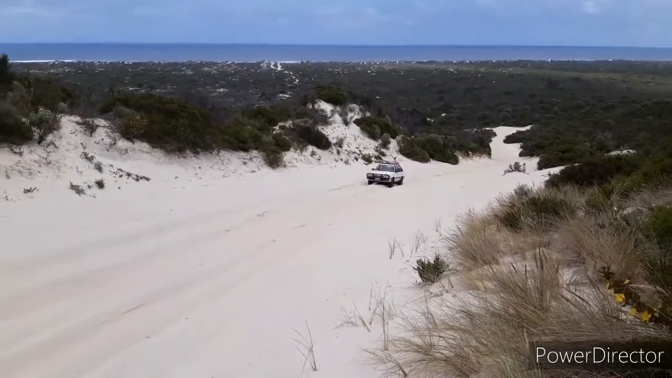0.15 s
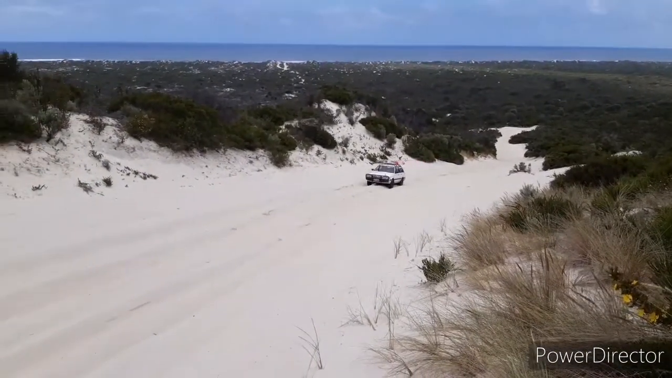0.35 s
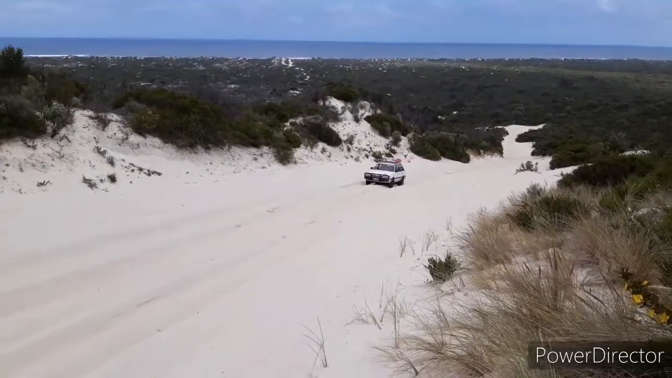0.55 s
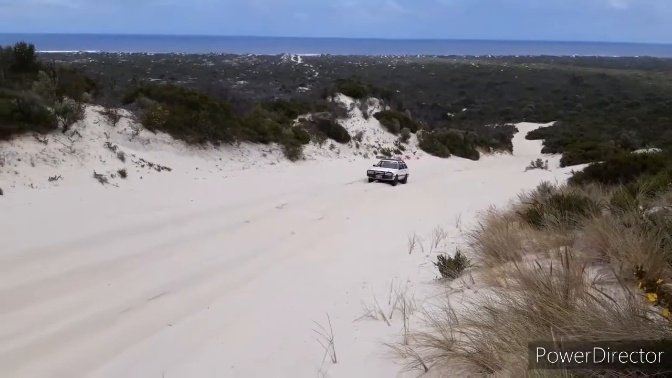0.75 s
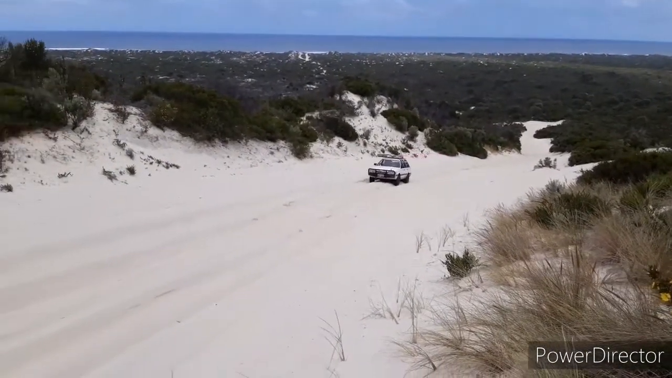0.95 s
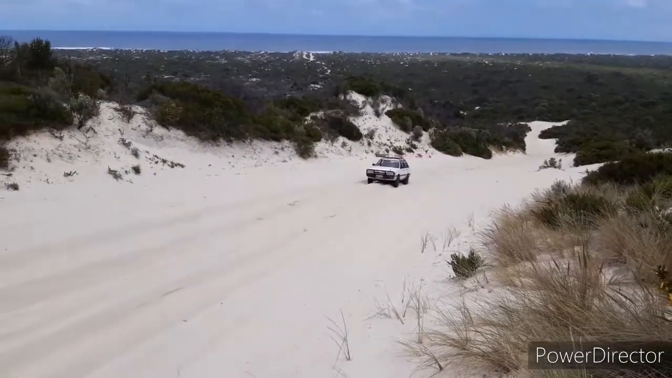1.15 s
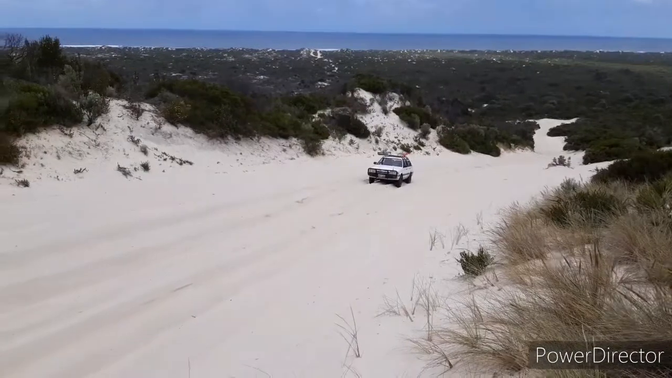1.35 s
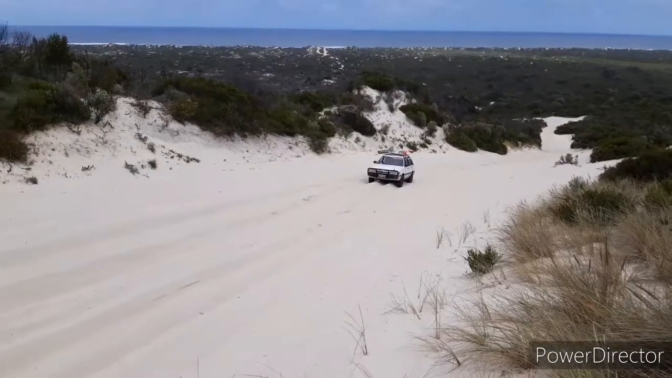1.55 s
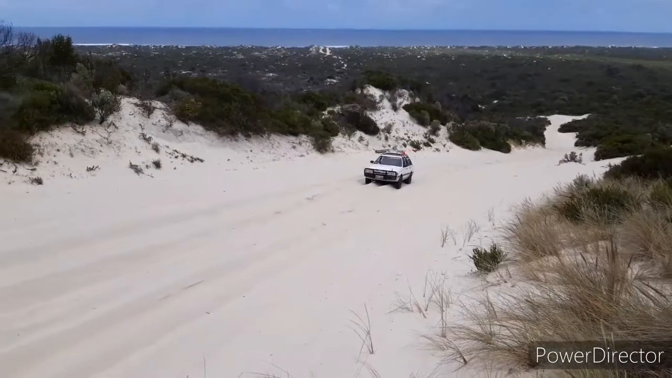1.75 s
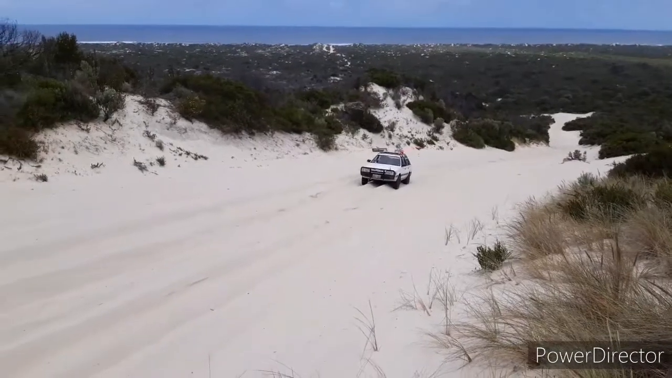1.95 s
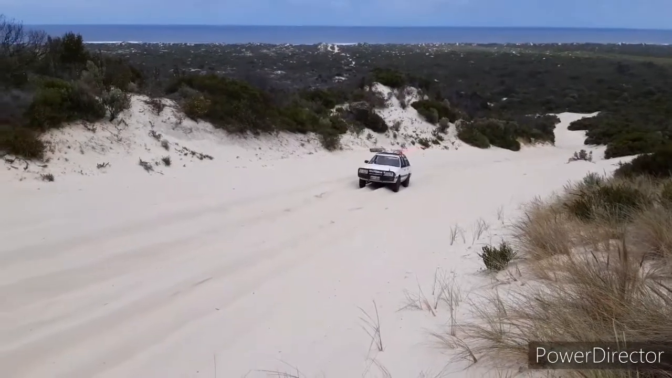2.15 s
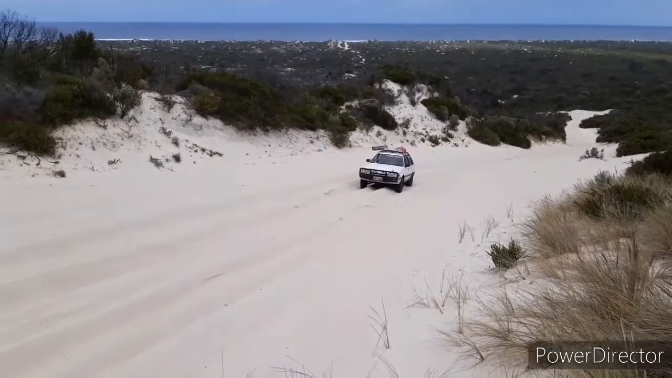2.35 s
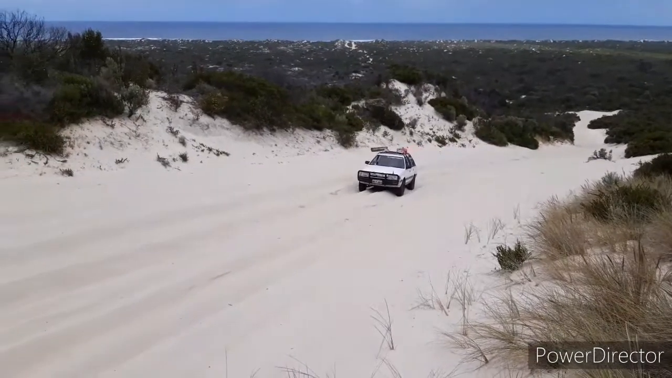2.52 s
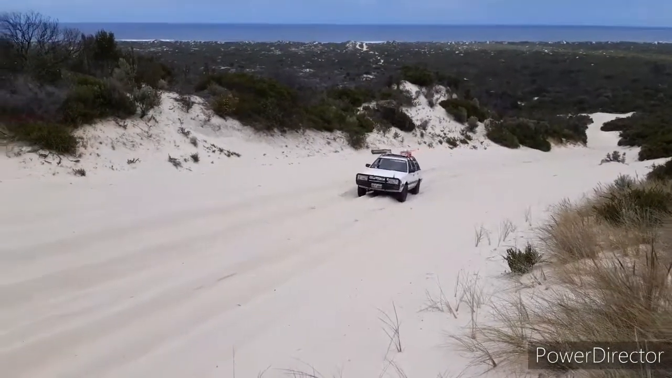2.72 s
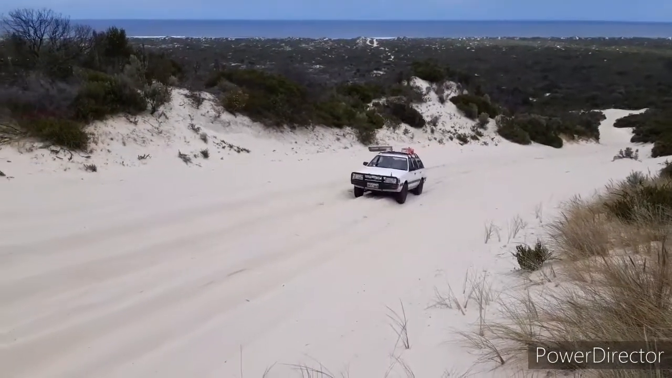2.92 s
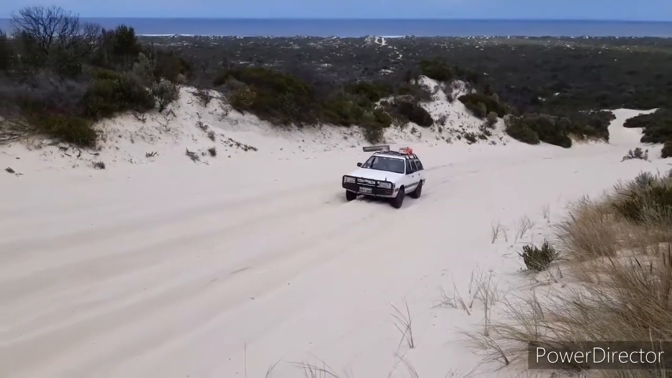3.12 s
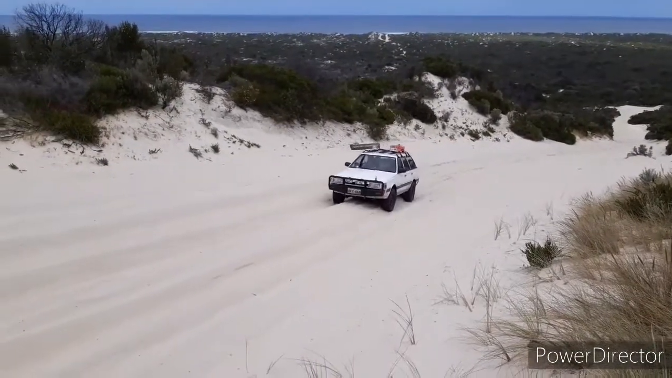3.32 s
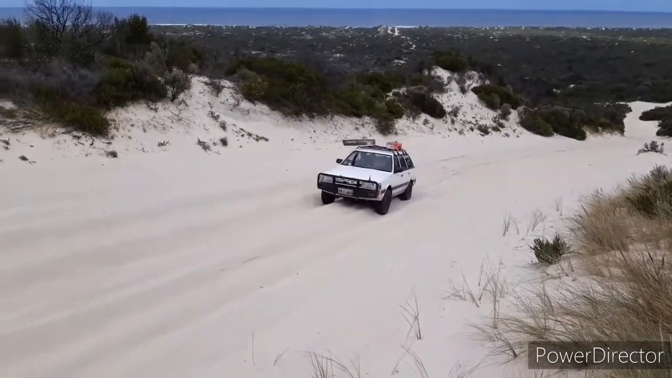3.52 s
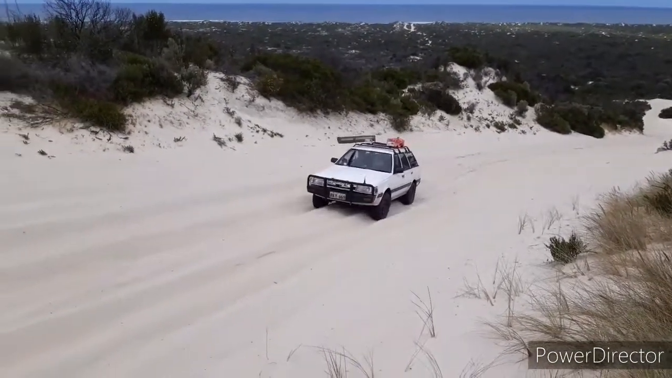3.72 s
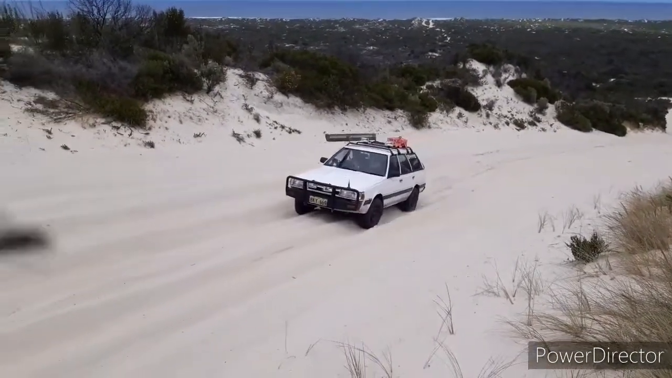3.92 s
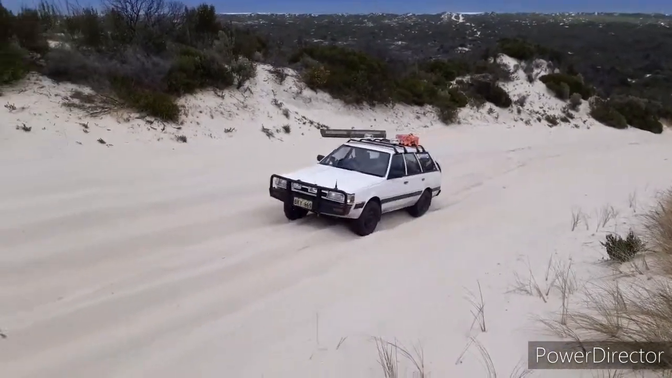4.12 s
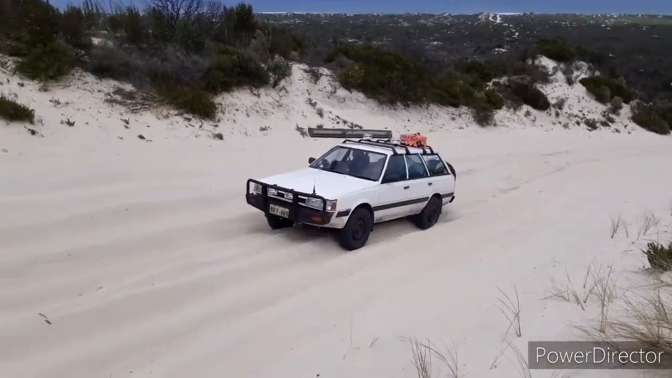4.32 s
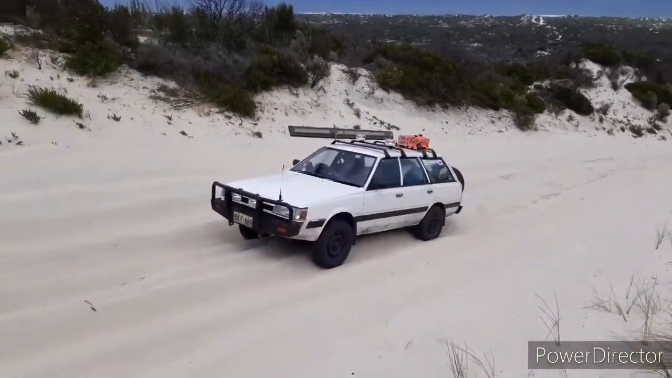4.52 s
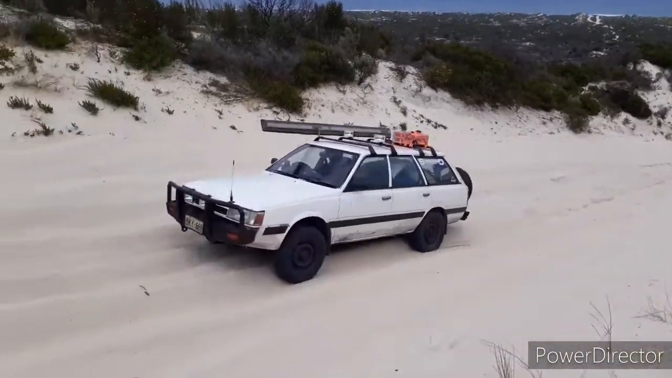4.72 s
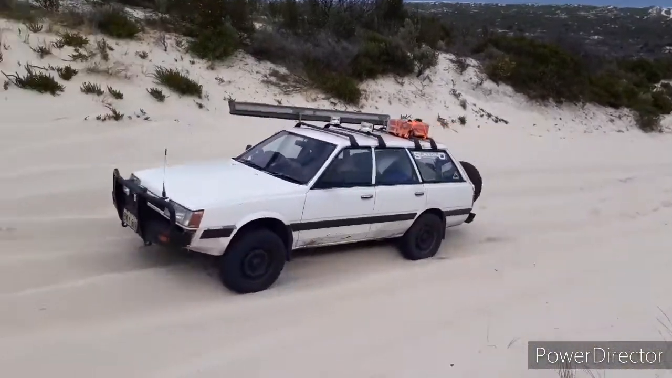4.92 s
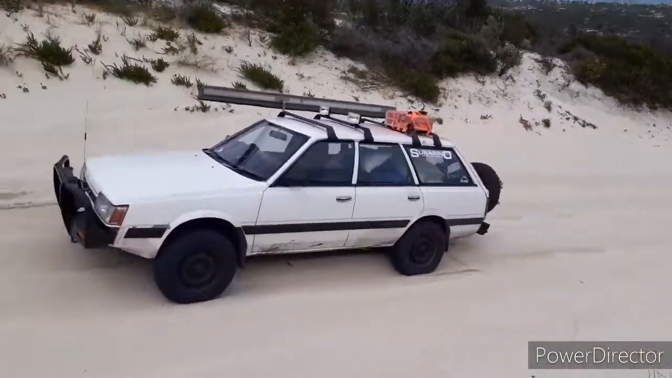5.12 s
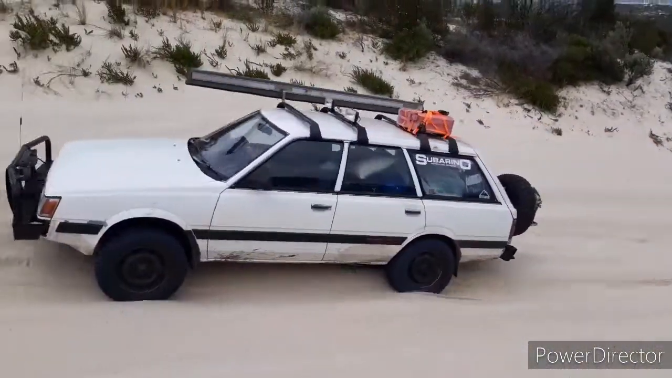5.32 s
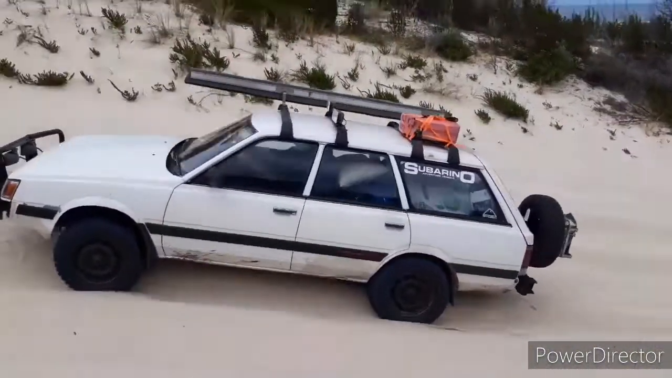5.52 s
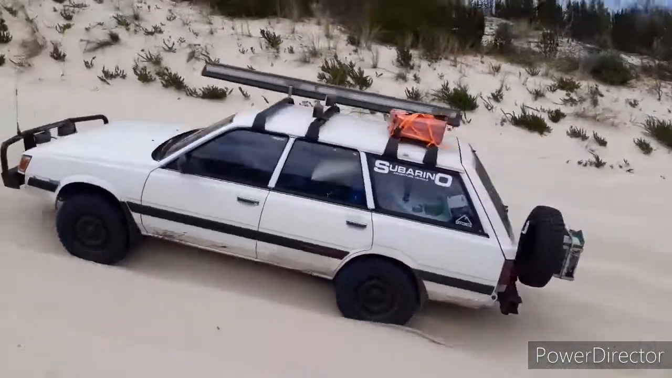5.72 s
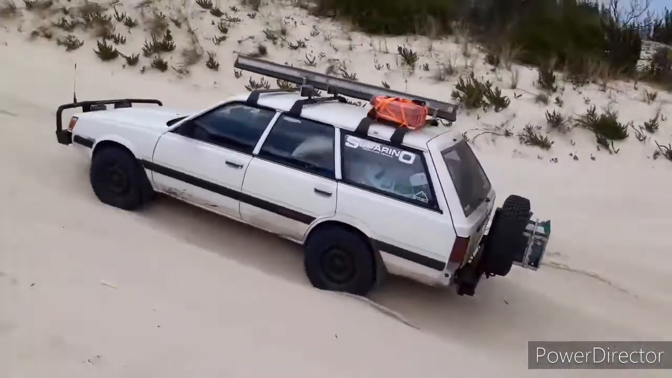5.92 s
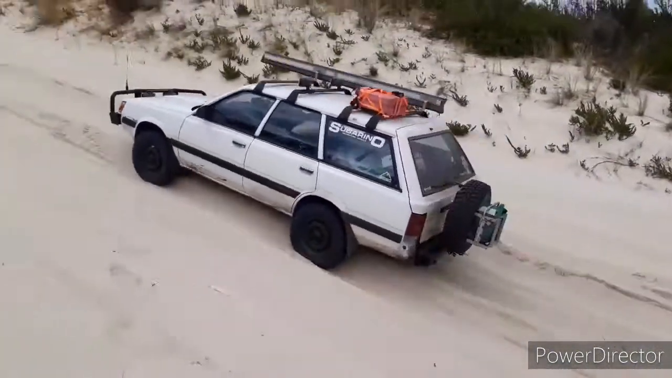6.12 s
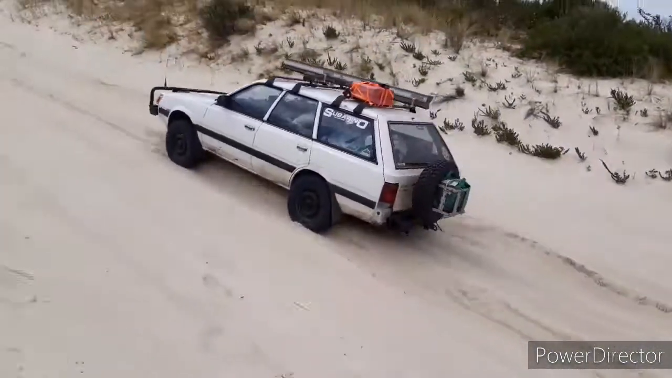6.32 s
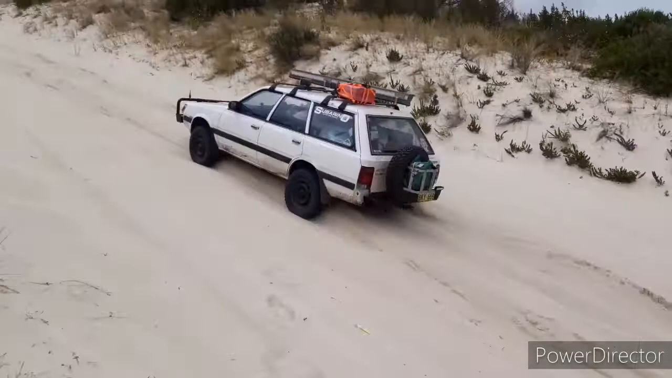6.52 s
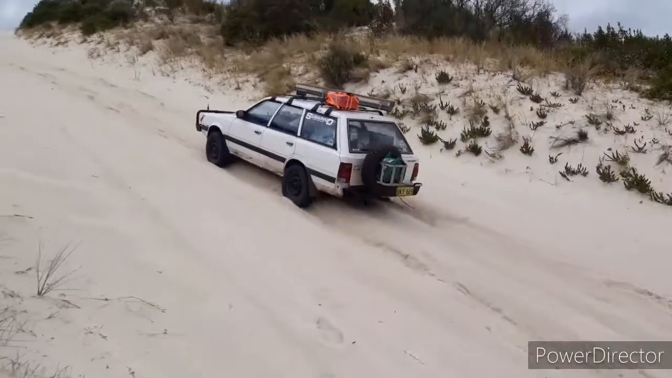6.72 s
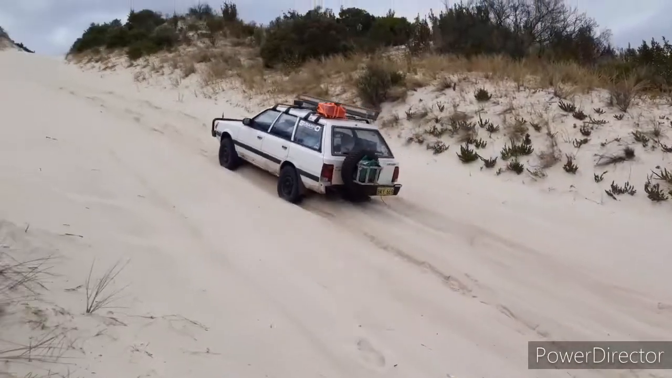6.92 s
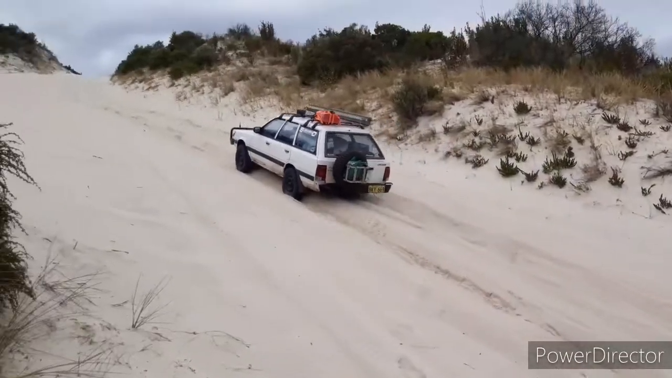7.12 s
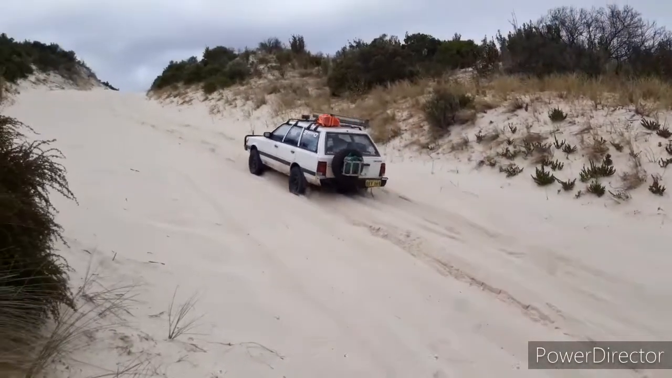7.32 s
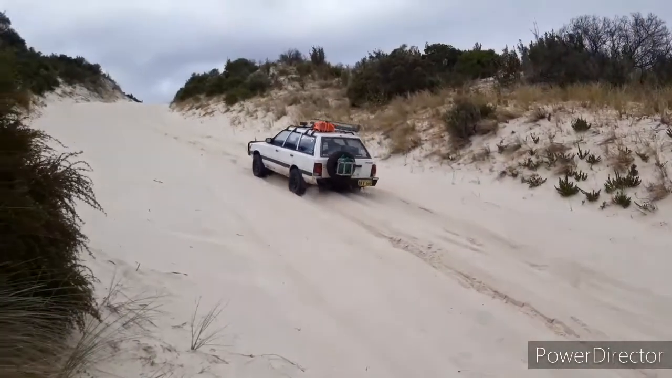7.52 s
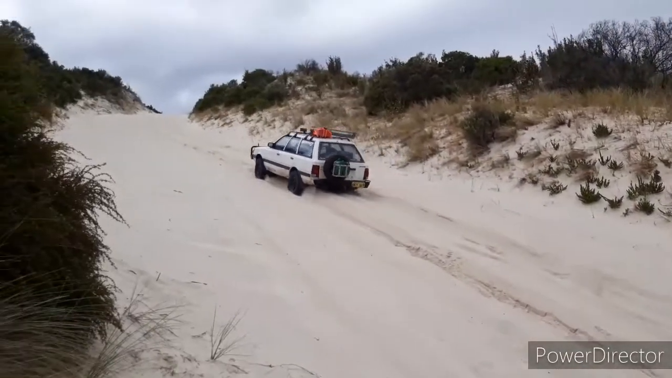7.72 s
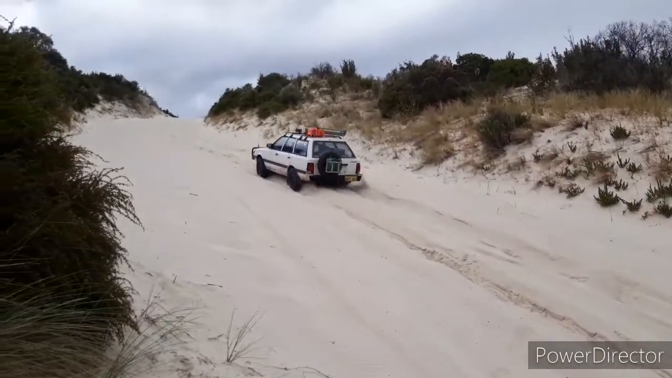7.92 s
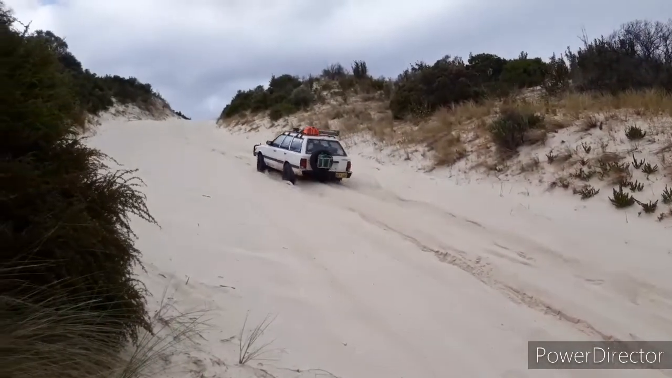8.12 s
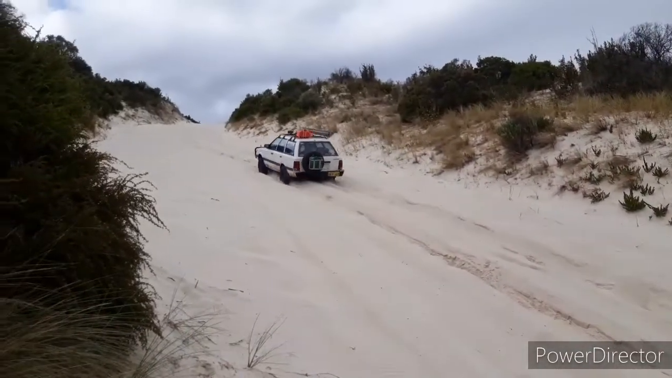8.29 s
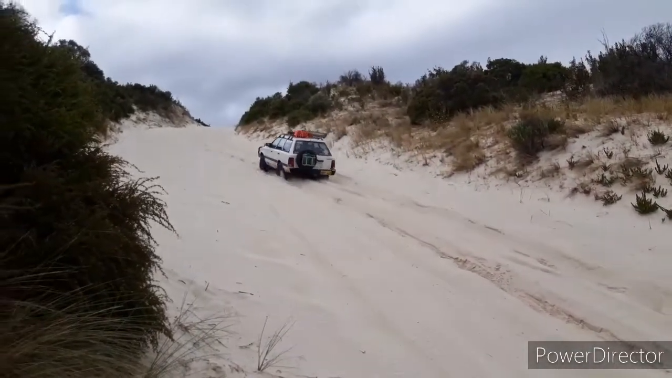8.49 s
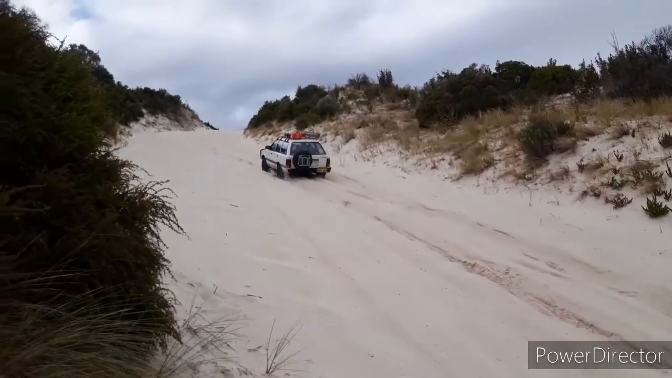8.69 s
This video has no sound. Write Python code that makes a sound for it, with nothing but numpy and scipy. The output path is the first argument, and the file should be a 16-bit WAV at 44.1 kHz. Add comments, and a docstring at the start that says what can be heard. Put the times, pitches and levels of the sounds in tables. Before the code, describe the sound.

From 0 to 3 s a distant car works uphill, a soft broadband engine roar with a faint thin whine and low uneven drone, partly covered by lumpy low wind thumps, strongest around 2-3 s. The revs stay nearly constant, dipping slightly at about 0.6 s and recovering. From 3 to 5 s it approaches: roar, fast firing throb and a whine near 780 Hz swell, the whine clearest around 4.7-5.3 s. At about 5.2-5.9 s it passes close; the whine vanishes and airy roar gives way to a full, buzzing exhaust drone with revs easing slightly. Metallic rasp and fine crackle peak near 6.7 s, pulsing unevenly. After 7 s the rasp drops and flutters while the low drone persists, gently surging about twice a second, with wind gusts near 8.25 s. Dry, open outdoor stereo, close handheld microphone.

```python
"""First you hear an engine bay roar and whine over steady exhaust tones, with wind buffeting two microphones.
A four-cylinder car with an uneven exhaust is climbing a sand dune past someone holding the microphones.
Then its tailpipe swings round: sharp cracks and noisy blows, one cylinder's crack loudest, ring the pipe.
The tones are sine waves locked to the engine; roar, rasp and wind are filtered noise.
The holder's body throws a short echo of the car into both microphone ports."""
import sys
import numpy as np
from scipy import signal
from scipy.io import wavfile
from scipy.ndimage import uniform_filter1d

SR = 44100
rng = np.random.default_rng(int(sys.argv[2]) if len(sys.argv) > 2 else 0)


def output_pcm(signal):
    """Save a mono or channel-first signal as 16-bit PCM at the path in sys.argv[1].

    Samples are clipped to [-1, 1] before scaling.
    """
    pcm = np.clip(np.atleast_2d(signal).T, -1, 1) * 32767
    wavfile.write(sys.argv[1], SR, np.round(pcm).astype(np.int16))


N = 385875
T = np.arange(N) / SR  # time of each sample, s

# Engine speed as heard, before surging: (time [s], engine cycles per second [Hz])
ENGINE_SPEED = [(0.0, 42.91), (0.4, 42.58), (0.6, 39.97), (0.8, 39.99), (1.1, 40.19), (1.6, 41.88),
                (2.1, 43.02), (2.7, 43.39), (3.3, 43.39), (3.5, 44.11), (3.8, 43.85), (4.2, 44.86),
                (4.4, 44.21), (4.6, 44.89), (4.9, 42.89), (5.1, 42.95), (5.4, 41.99), (5.8, 41.54),
                (6.6, 40.72), (6.8, 40.85), (7.7, 41.05), (8.75, 40.73)]
# Exhaust tone levels: (time [s], unused [dB], uneven beat [dB], firing tone [dB], its octave [dB])
TONE_LEVELS = [(0, -46, -33.5, -39, -43), (.4, -42.5, -36.5, -44, -33.5), (1.2, -37.5, -32, -35, -28.5),
               (2, -37, -29.5, -36, -30.5), (2.4, -39, -31, -36, -34), (2.8, -35.5, -28.5, -32, -33),
               (3.2, -39, -25, -29.5, -23), (4, -30, -24.5, -25, -25), (4.3, -28.5, -21, -20.5, -28.5),
               (4.75, -22, -24, -18.5, -22), (5.2, -24, -20.5, -20.5, -23), (5.6, -22, -16, -18, -14.5),
               (6, -22.5, -16.5, -26, -13), (6.5, -22, -17, -20, -15), (6.75, -23.5, -17.5, -19.5, -18),
               (7.1, -24, -18.5, -20.5, -18), (7.75, -37, -21.5, -24, -19.5),
               (8.75, -29, -21, -28.5, -17.5)]
# Tones as multiples of the engine cycle, with levels relative to the tone levels above:
# (multiple [cycles], from the front [dB], from the side [dB], from behind [dB])
TONE_SERIES = [(1.02, -55, -54, -57), (2, -27, -34, -28), (2.984, -4, -3.5, -7), (4, 1, 0, 0.5),
               (5, -5.5, -9.5, -7), (6, -8.5, -5, -13.5), (7, -8.5, -10, -15.5), (8, 0, 1, 0),
               (9, -38, -20, -21.5), (10, -44, -43, -41), (11, -16, -18.5, -18.5), (11.94, -10.5, -21, -14),
               (13, -19, -20, -16.5), (14, -24, -21.5, -20), (15, -19, -27, -22.5), (16, -28, -28, -22.5),
               (17, -34, -21, -16.5), (18, 0, 0, 0), (19, 0, 0, 0), (19.68, -15, -31, -28),
               (20.65, -39, -30, -35), (21.6, -49, -31, -38), (23, -47, -32, -34.5), (24.1, -24, -26, -27),
               (25, -44, -31, -28), (25.85, -46, -36, -34), (27.2, -43, -41.5, -34)]
# Times for the three views in that list, front, side and behind: (time [s])
VIEW_TIMES = [5.04, 5.83, 5.98]
# Level of the note the muffler picks out: (time [s], level [dB])
MUFFLER_LEVEL = [(5.2, -33), (5.5, -13.5), (5.8, -30.5), (6.05, -20.5), (6.3, -33), (6.55, -22),
                 (6.75, -32.5), (7, -21), (7.25, -28), (8.75, -32.5)]
# Engine bay levels: (time [s], roar [dB], treble loss [dB per octave], panel boom [dB], fine hiss [dB])
BAY_LEVELS = [(0, -31.5, -1.5, -43, -48), (1, -30.5, -1, -37.5, -52.5), (2, -29.5, -0.5, -39.5, -46),
              (2.5, -29, -1, -40, -46), (3, -27.5, -0.5, -34, -45), (3.5, -26, 0, -30.5, -45.5),
              (4, -24.5, 1, -29, -44.5), (4.3, -23.5, 1.5, -29, -48), (4.6, -24, 1, -25, -44.5),
              (4.95, -25, 1.5, -29, -45.5), (5.2, -25, 2, -26, -46), (5.5, -29.5, 2.5, -23, -43.5),
              (5.8, -35, -1, -25.5, -48), (6.1, -34, -2.5, -29.5, -45), (6.5, -39, -6.5, -35.5, -57),
              (7, -42.5, -5, -31.5, -58), (7.5, -41, 0.5, -34.5, -59), (8.75, -52.5, -7.5, -37.5, -67)]
# Tone colour of the roar: (frequency [Hz], relative level [dB])
ROAR_COLOUR = [(35, -65), (60, -15.5), (156, -15), (343, -14), (420, -28), (520, -16.5), (800, -19),
               (950, -18), (1520, -18.5), (2000, -23.5), (3270, -21), (5000, -24.5), (7000, -32),
               (8300, -45.5), (15500, -64.5)]
# Fan or belt whine: (time [s], pitch [Hz], level [dB], octave level [dB])
WHINE_PATH = [(0.0, 780, -37, -41.5), (0.57, 764, -36.5, -45.5), (2.03, 793.7, -34.5, -46),
              (4.09, 787.8, -24, -38), (4.19, 785, -33, -50), (4.71, 766.4, -19, -36.5),
              (5.32, 769.3, -19, -44), (5.4, 767, -26, -32)]
# Background wind buffeting: (time [s], level [dB])
BREEZE_LEVEL = [(0, -36.5), (1.6, -34.5), (2.2, -37.5), (3.3, -33), (4, -36), (6, -34.5), (7.5, -35),
                (8.3, -32.5), (8.75, -31)]
# Single gusts, added in power to the breeze: (middle [s], peak level [dB], length [s])
SINGLE_GUSTS = [(.02, -30.5, .1), (0.356, -31, 0.088), (1.75, -31, .1), (1.921, -29.5, 0.12),
                (2.258, -26, .3), (2.624, -27, 0.074), (2.8, -29, 0.15), (2.98, -31, .1), (6.65, -31, 0.61),
                (7.18, -29.5, 0.16), (7.52, -32, 0.065), (7.872, -32, .12), (8.25, -25.5, 0.34),
                (8.662, -29.5, .1)]
# Tone colour of the wind: (frequency [Hz], relative level [dB])
WIND_COLOUR = [(15, -70.5), (25, -15.5), (210, 3.5), (271, -1), (338, -0.5), (619, -11), (771, -14.5),
               (1260, -24.5), (2000, -28.5), (2600, -31), (4400, -120)]
# Cylinders in firing order: (place in the cycle [0-1], relative blow [dB], relative crack [dB])
CYLINDER_FIRINGS = [(0, 5, 6), (0.283, 1.5, -5.5), (.53, 4, -3), (.78, -10, -47)]
# Tailpipe levels once it faces the microphones: (time [s], rasp [dB], sizzle [dB])
PIPE_LEVELS = [(5.25, -29, -50), (5.75, -38.5, -54), (6.1, -35.5, -48), (6.45, -29, -38), (6.75, -24, -38),
               (6.95, -31.5, -46.5), (7.2, -29, -47.5), (7.4, -37.5, -59), (7.55, -44, -60),
               (7.65, -39, -65), (7.75, -47, -60), (7.85, -40, -58), (7.95, -44.5, -62), (8.08, -36.5, -57),
               (8.25, -46, -60), (8.38, -38, -55), (8.53, -37.5, -47.5), (8.75, -44.5, -56)]
# Pipe resonances, with levels relative to the rasp at each of the five angles below:
# (frequency [Hz], width [Hz], share of crack [0-1], angle 1 [dB], 2 [dB], 3 [dB], 4 [dB], 5 [dB])
PIPE_MODES = [(1340, 69, 0.55, -10, -8, -9, -9.5, -16), (1514, 160, 0.28, -2, -5, -15, -18, -27),
              (1730, 43, 0.45, 1.5, -6, -16, -37, -17), (1972, 87, 0.4, 6, 4.5, -12, -11, -22),
              (2115, 87, 0.41, 1, -1, -20.5, -16, -15), (2330, 320, 0.44, 3, -7, -17, -11.5, -9),
              (3100, 53, 0.28, -2, -3, -5.5, -12, -0.5), (3450, 280, 1, -14, -12, -11, -9.5, -9),
              (3903, 260, 0.48, 2, 2.5, -16, -20, 1.5), (4115, 63, 0.19, -11, -6, -11, -17, -9),
              (4546, 470, 0.47, -1, -3, -1, -3, 0), (5020, 620, 1, 0.5, 3, -4, -2.5, -8),
              (6000, 220, 0.5, -3, -4.5, -15.5, -19, -11.5), (7200, 410, 0.64, -6, -10.5, -15.5, -32, -26)]
# Times at which the pipe is seen from the side, then ever more from behind: (time [s])
ANGLE_TIMES = [5.8, 6.25, 6.75, 7.15, 7.6]
# Resonances of the finest exhaust noise: (frequency [Hz], width [Hz], relative level [dB])
SIZZLE_MODES = [(9860, 960, 3.5), (11340, 2500, 8), (13500, 1600, -21.5)]
# Where the car is: (time [s], left lag of the bay [samples], left lag of the tailpipe [samples],
# width of the car [0-1], body echo delay [ms])
CAR_BEARING = [(0, 1, -2, 0.27, 1.8), (3, .5, 5, 0.25, 1.695), (4.2, -1.5, -4, 0.44, 1.69),
               (4.8, -5.5, -3, 0.17, 1.62), (5.1, -7.5, -0.5, 0.63, 1.72), (5.6, -11.5, 5.5, 0.5, 1.566),
               (6.6, -5.5, 0.6, 0, 1.62), (7.05, -2, -0.6, 0.5, 1.53), (7.5, -4, 0, 0.3, 1.63),
               (8.75, -3, -2.5, .4, 1.59)]
# Difference between the ports: (frequency [Hz], phase [rad], left over right [dB])
PORT_DIFFERENCE = [(200, -0.023, -2), (1010, -0.065, -0.5), (2000, -0.082, 3.5), (3430, 0.54, -3),
                   (5670, -0.42, -2.5), (6800, -1.2, 0), (10300, 0.34, 1.5), (15000, 0.55, -1)]
# How fast the ports lose likeness as the car gets wider: (frequency [Hz], loss rate [per unit width])
LIKENESS_LOSS = [(300, 0.052), (1000, 0.19), (3000, 0.92), (8000, 0.54), (11000, 1.2)]
# Strength of the body echo: (frequency [Hz], left share [0-1], right share [0-1])
BODY_ECHO = [(613, 0.075, 0), (1260, 0.29, 0.015), (1750, 0.61, 1), (2350, 0.77, 1), (3000, 0.6, 0.47),
             (4200, 0, 0.17), (6000, 0.074, 0.69)]

FIRST_TURN = -.14  # starting point, in engine cycles
SURGE_HZ, SURGES_PER_S, SURGE_PEAK_S, SURGE_FROM_S = .3, 2.36, 7.7, 5.5  # surging on the steep part
FADE_DB, FADES_PER_S = 1.8, 4  # each uneven multiple fades in and out on its own
MUFFLER_HZ, MUFFLER_WIDTH_HZ = 782.3, 9
NOSE_PAST_S = 5.45  # the whine is hidden from here on
TURN_S, TURN_TAKES_S = 5.194, 0.74  # the tail of the car swings towards the microphones
PAN_DB = 2  # left over right
EDGE_HZ = 15650  # upper limit of the sound


def amp(db):
    """Turns decibels into a multiplier."""
    return 10 ** (np.asarray(db) / 20)


def evened(x):
    """Scales a sound to an average (rms) level of 1."""
    return x / np.sqrt(np.mean(x ** 2) + 1e-20)


def curves(rows, t):
    """Reads each column of a table at the times t, with straight lines between rows."""
    s, *columns = np.transpose(rows)
    return [np.interp(t, s, c) for c in columns]


def over(rows, hz):
    """Reads each column of a table at the frequencies hz, on a logarithmic scale."""
    f, *columns = np.transpose(rows)
    return [np.interp(np.log(hz + 1), np.log(f + 1), c)[:, None] for c in columns]


def resonate(x, hz, width):
    """A resonance of gain 1: shifts hz down to zero, smooths, and shifts back."""
    turn = np.exp(2j * np.pi * np.cumsum(hz * np.ones(N)) / SR)
    r = np.exp(-np.pi * width / SR)
    smoothed = signal.lfilter([1 - r], [1, -r], x / turn, axis=-1)
    return 2 * (turn * smoothed).real


def drift(per_s):
    """A slow random wander of rms 1, with per_s new random values each second."""
    steps = np.arange(0, N / SR + 1, 1 / per_s)
    wander = np.interp(T, steps, rng.standard_normal(len(steps)))
    return evened(uniform_filter1d(wander, int(SR / per_s)))


def shape(x, gain):
    """Colours a sound by multiplying its short-time spectrum by gain(hz, t)."""
    hz, t, z = signal.stft(x, SR, nperseg=1024, noverlap=768)
    return signal.istft(z * gain(hz, t), SR, nperseg=1024, noverlap=768)[1][..., :N]


def speed():
    """Engine cycles per second: the slow curve plus surging on the steep part."""
    grow = np.clip((T - SURGE_FROM_S) * SURGES_PER_S, 0, 1)
    surge = np.cos(2 * np.pi * SURGES_PER_S * (T - SURGE_PEAK_S)) * grow
    return curves(ENGINE_SPEED, T)[0] + SURGE_HZ * surge


def firings(turns, decay_s, jitter_db, sharp=False):
    """A pulse that jumps at each cylinder's firing and dies away; sharp picks crack over blow levels."""
    clicks = np.zeros(N)
    for place, *db in CYLINDER_FIRINGS:
        at = np.flatnonzero(np.diff(np.floor(turns - place)))
        jitter = jitter_db * rng.standard_normal(len(at))
        clicks[at] = amp(db[sharp] + jitter)
    return signal.lfilter([1], [1, -np.exp(-1 / (decay_s * SR))], clicks)


def bay(turns):
    """Fan and intake noise throbs with the firings, beside booming panels, fine hiss and the whine."""
    def colour(hz, t):
        roar_db, loss_db = curves(BAY_LEVELS, t)[:2]
        octaves = np.log2(np.maximum(hz, 1500) / 1500)[:, None]  # treble loss starts at 1500 Hz
        return amp(over(ROAR_COLOUR, hz)[0] + roar_db - loss_db * octaves)
    throb = 1 + 0.19 * evened(firings(turns, 0.0096, 4.9))
    air = throb * rng.standard_normal((2, N))
    # the roar's level is set by its colour from about 990 Hz up
    upper_hz = np.fft.rfftfreq(1024, 1 / SR)[23:]
    upper_power = np.mean(amp(over(ROAR_COLOUR, upper_hz)[0]) ** 2)
    roar = shape(air, colour) / np.sqrt(upper_power * np.mean(throb ** 2))
    boom_db, hiss_db = curves(BAY_LEVELS, T)[2:]
    boom = evened(resonate(resonate(air, 740, 120), 747, 294))
    hiss = evened(resonate(resonate(air, 12300, 5000), 11000, 7800))
    return roar + amp(boom_db) * boom + amp(hiss_db + 0.88 * drift(29)) * hiss + whine()


def whine():
    """A fan or belt gives a thin note and its octave, hidden once the nose has passed."""
    hz, db, octave_db = curves(WHINE_PATH, T)
    angle = 2 * np.pi * np.cumsum(hz + 3.21 * drift(25)) / SR
    fade_out = np.clip((NOSE_PAST_S - T) / 0.09, 0, 1)
    heard = np.sqrt(2) * fade_out * amp(0.32 * drift(20))
    return heard * (amp(db) * np.sin(angle) + amp(octave_db) * np.sin(2 * angle))


def tones(turns):
    """Repeating firings give multiples of the cycle: firing tone, octave, uneven beat and muffler note."""
    _, beat_db, firing_db, octave_db = curves(TONE_LEVELS, T)
    muffler_db = curves(MUFFLER_LEVEL, T)[0]
    out = np.zeros(N)
    for k, *view_db in TONE_SERIES:
        uneven_db = beat_db + FADE_DB * drift(FADES_PER_S)
        tone_db = {4: firing_db, 8: octave_db}.get(k, uneven_db)
        gain = amp(tone_db + np.interp(T, VIEW_TIMES, view_db))
        if k in (18, 19):  # these two follow the muffler instead, loudest when close to its pitch
            off_pitch = (k * speed() - MUFFLER_HZ) / MUFFLER_WIDTH_HZ
            gain = amp(muffler_db) * (T > MUFFLER_LEVEL[0][0]) / np.hypot(1, off_pitch)
        # higher multiples waver more, as firings differ from cycle to cycle
        waver = .018 * k * drift(12)
        # the muffler spreads each pulse out: it rings after the blow, the upper multiples latest
        lag = .45 + .03 * max(k - 9, 0) ** 2
        wave = np.sin(2 * np.pi * k * turns + waver - lag)
        out -= np.sqrt(2) * gain * amp(drift(9)) * wave
    return out


def wind():
    """Lumpy low buffeting, with unrelated noise in the two ports: a breeze with single gusts on top."""
    lumps = amp(np.array([3.7 * drift(40), 1.9 * drift(40)]))
    buffet = shape(rng.standard_normal((2, N)), lambda hz, t: amp(over(WIND_COLOUR, hz)[0]))
    gusts = sum(amp(db) ** 2 * np.exp(-(2 * (T - s) / length) ** 2) for s, db, length in SINGLE_GUSTS)
    breeze = amp(curves(BREEZE_LEVEL, T)[0]) ** 2
    return np.sqrt(2 * (breeze + gusts)) * evened(lumps * buffet)


def facing():
    """0 while the nose points at the microphones, rising to 1 as the tailpipe swings round."""
    return np.clip((T - TURN_S) / TURN_TAKES_S, 0, 1)


def tailpipe(turns):
    """Sharp cracks over noisy blows make the pipe ring in modes that beam different ways."""
    noise = rng.standard_normal((2, 2, N))
    # the pressure step keeps its shape, with a short noisy tail
    step = evened(firings(turns, .00004, 1.2, sharp=True))
    tail = evened(firings(turns, .0009, 1.2, sharp=True)) * noise[0]
    crack = evened(.45 * tail - step)
    blow = evened((evened(firings(turns, 0.0047, 2.9)) + 0.64) * noise[1])
    rasp_db, sizzle_db = curves(PIPE_LEVELS, T)
    # the high modes beam narrowly and swell as the car sways; the low ones follow the mean level
    mean_db = uniform_filter1d(rasp_db, SR // 2)
    rasp = 0
    for hz, width, share, *angle_db in PIPE_MODES:
        drive = share * crack + (1 - share) * blow
        ring = evened(resonate(resonate(drive, hz, width), hz, 2.1 * width))
        level_db = rasp_db if hz > 4000 else mean_db
        rasp = rasp + amp(level_db + np.interp(T, ANGLE_TIMES, angle_db)) * ring
    sizzle = 0
    for hz, width, db in SIZZLE_MODES:
        drive = 0.72 * crack + 0.45 * blow
        sizzle = sizzle + amp(db) * resonate(resonate(drive, hz, width), hz, width)
    return facing() * (rasp + amp(sizzle_db) * evened(sizzle))


def ports(pair, rear):
    """Two ports hear one end of the car: delay by bearing, less alike when it is wide, plus body echo."""
    hz, t, (a, b) = signal.stft(pair, SR, nperseg=1024, noverlap=768)
    *lags, width, echo_ms = curves(CAR_BEARING, t)
    phase, tilt_db = over(PORT_DIFFERENCE, hz)
    likeness = np.exp(-abs(width * over(LIKENESS_LOSS, hz)[0]))
    # half of each difference goes to the left, the opposite half to the right
    turn = phase + 2 * np.pi * hz[:, None] * lags[rear] / SR
    half = amp((PAN_DB + tilt_db) / 2) * np.exp(-.5j * turn)
    right = likeness * a + np.sqrt(1 - likeness ** 2) * b
    heard = np.array([a * half, right / half])
    echo = np.exp(-2j * np.pi * hz[:, None] * echo_ms / 1000)
    heard *= 1 - np.array(over(BODY_ECHO, hz)) * echo  # the echo comes back upside down
    return signal.istft(heard, SR, nperseg=1024, noverlap=768)[1][:, :N]


def scene():
    """Both ends of the car pass through the ports; the wind strikes the ports directly."""
    turns = np.cumsum(speed()) / SR + FIRST_TURN
    exhaust = tailpipe(turns)
    exhaust[0] += tones(turns)
    return ports(bay(turns), rear=False) + ports(exhaust, rear=True) + wind()


def record(dry):
    """Rounds off the loudest peaks, then removes everything above the upper limit."""
    soft = dry / (1 + abs(dry / .95) ** 6) ** (1 / 6)
    low_pass = signal.firwin(511, EDGE_HZ, window=("kaiser", 9), fs=SR)
    return signal.oaconvolve(soft, low_pass[None], "same")


dry = scene()
out = record(dry)
output_pcm(out)
```